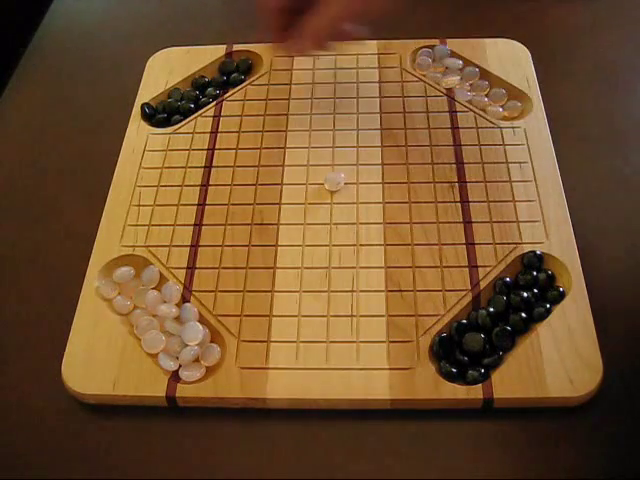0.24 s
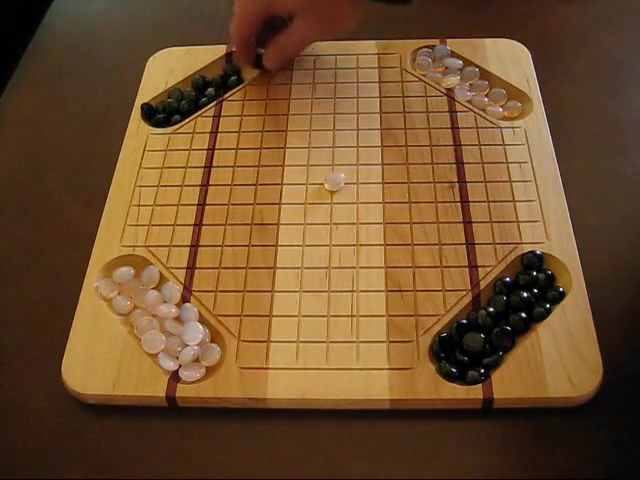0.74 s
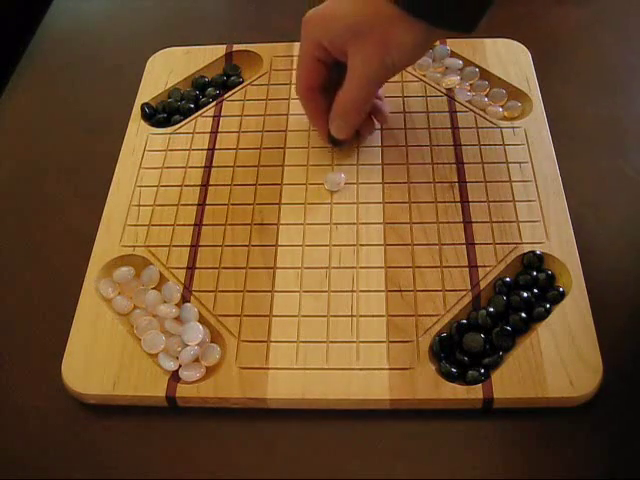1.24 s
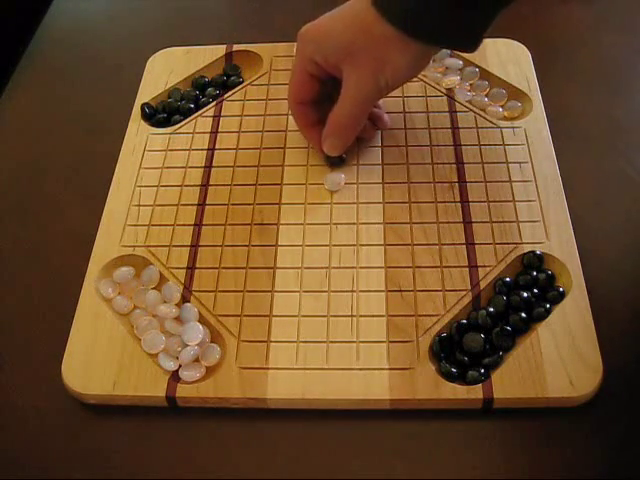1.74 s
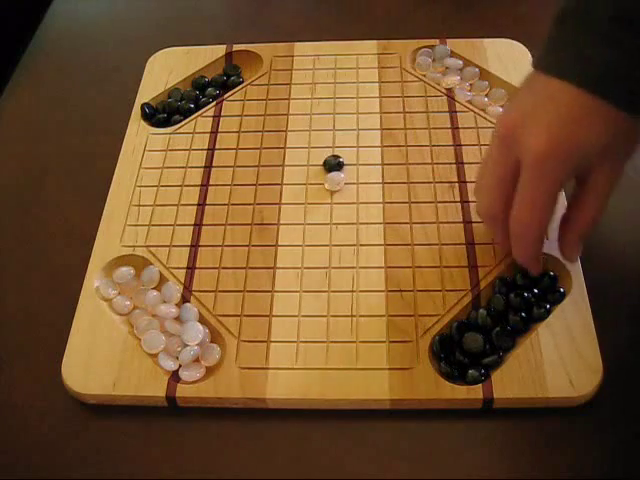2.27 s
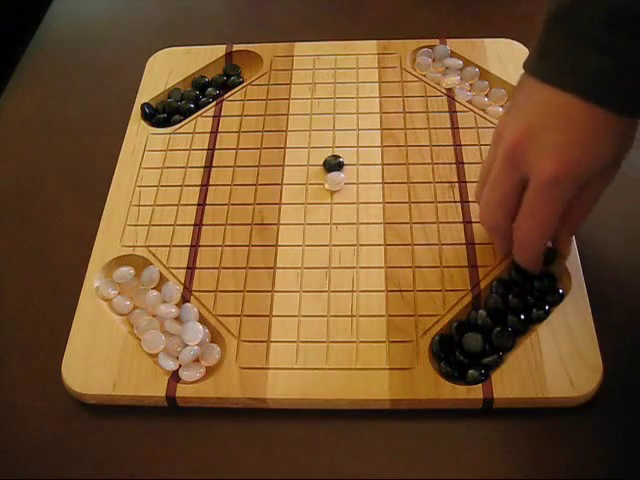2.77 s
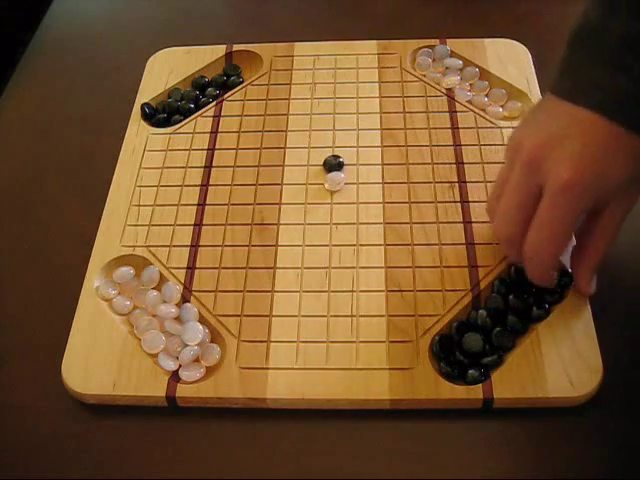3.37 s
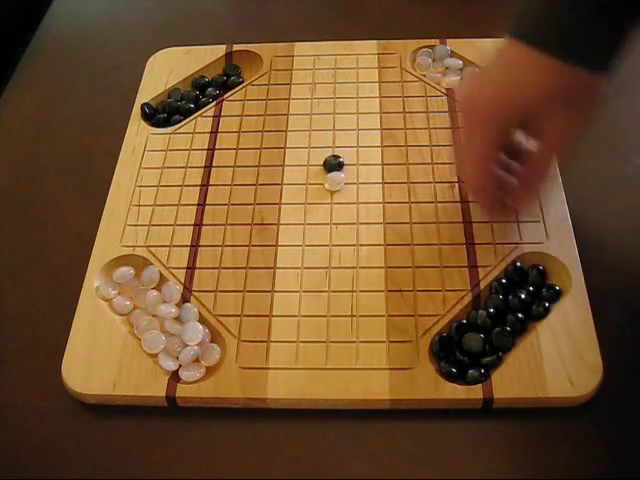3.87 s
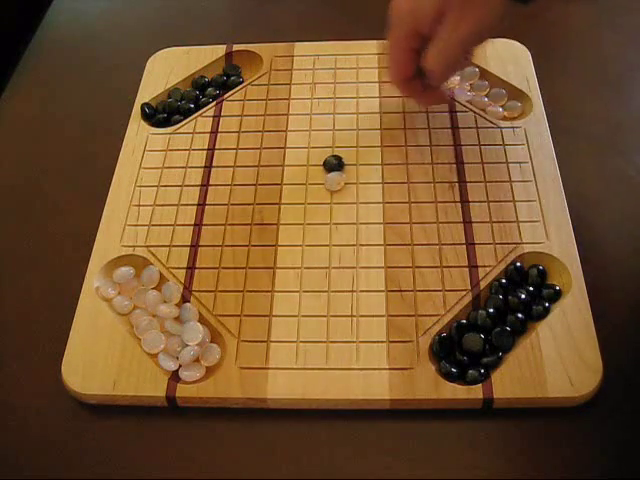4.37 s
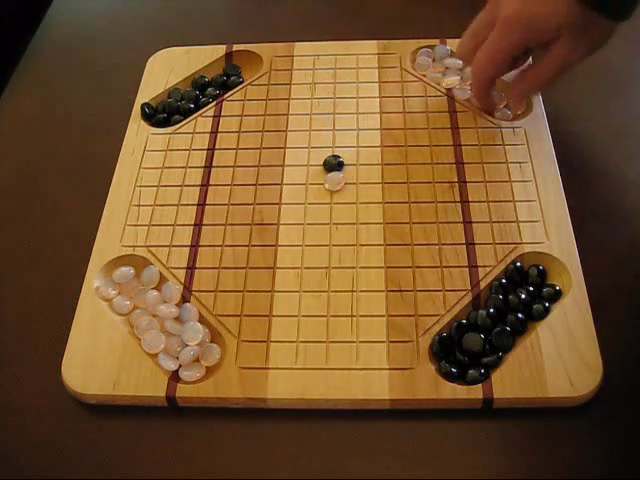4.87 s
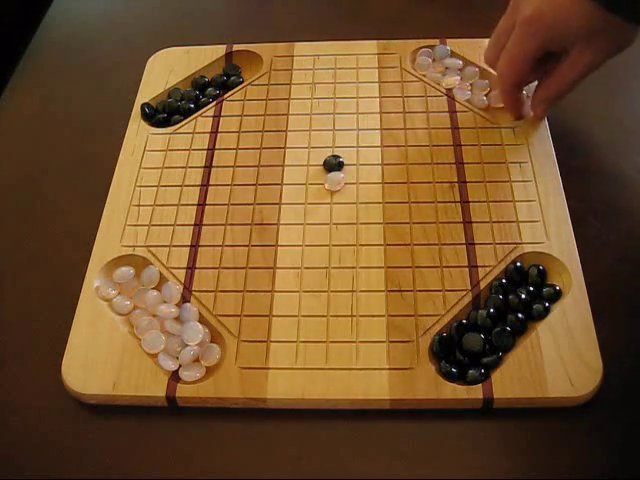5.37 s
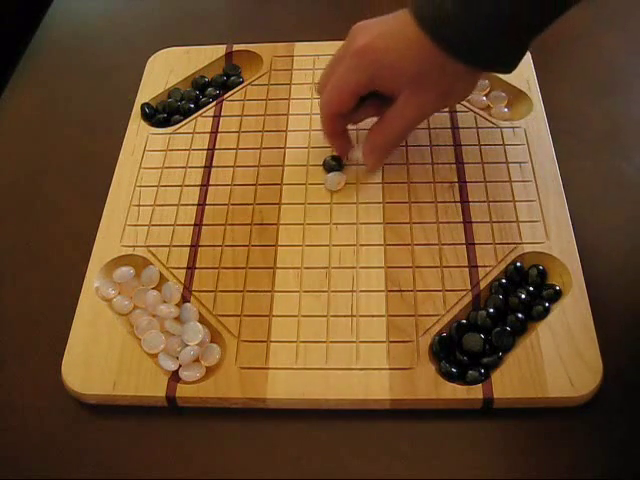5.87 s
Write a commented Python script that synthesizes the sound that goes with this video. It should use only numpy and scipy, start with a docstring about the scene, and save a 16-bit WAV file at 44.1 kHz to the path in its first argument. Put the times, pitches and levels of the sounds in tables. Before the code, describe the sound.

Glass playing pieces handled on a wooden board, heard close and dry with a short room reflection. Soft tray ticks come first, then a crisp solid knock on the wood. Dense glassy rattling fills the middle, with scraping fingers and woody clicks, then near silence. Gentle fumbling leads to a brief stuttering scrape and a final clack that rocks rapidly. Room hiss, a fading distant rush and a faint drone lie beneath.

```python
"""Glass gems on a wooden game board

Close up in a quiet room, fingers stir and pick gems from carved trays, drag one up a tray wall and set two down;
the last one rocks. Damped modes and filtered noise bursts make the knocks and glass ticks, sparse noise grains
the rubbing, and a train of short slips the drag. Under it lie shaped noise for the room, the hiss and a far rush
that dies away, and wavering, slowly sinking sines for a faint drone."""
import sys
import numpy as np
from scipy import signal
from scipy.fft import rfft, irfft, next_fast_len
from scipy.io import wavfile
from scipy.ndimage import map_coordinates

SR = 44100
rng = np.random.default_rng(int(sys.argv[2]) if len(sys.argv) > 2 else 0)


def int16_out(signal):
    """Quantize to a 16-bit WAV file."""
    q = np.round(np.clip(np.atleast_2d(signal).T, -1, 1) * 32767)
    wavfile.write(sys.argv[1], SR, q.astype(np.int16))


N = 269499
CLOCK = np.arange(N) / SR  # whole scene, s
HIT_CLOCK = np.arange(SR // 4) / SR  # one hit, s

# colour of a carved wooden tray being knocked or rubbed: (f/Hz, relative level/dB)
TRAY_COLOUR = [(60, -44), (300, -17.5), (1100, -11), (1500, -6.5), (2100, 3.5), (2600, -7), (3200, 0),
               (4500, -6.5), (6000, -12), (8000, -19.5), (16000, -26)]
# colour of glass touching glass: (f/Hz, relative level/dB)
GLASS_COLOUR = [(300, -97), (2000, -43), (5000, -13.5), (7000, -2.5), (9500, 5), (12000, 1), (15000, -3.5),
                (17000, -35)]


def amp(db):
    """Decibels to gain."""
    return 10 ** (np.asarray(db) / 20)


def unit(x):
    """x at rms 1."""
    return x / np.sqrt(np.mean(x ** 2) + 1e-20)


def blow(x):
    """x scaled to the energy of one millisecond of a full-scale sine."""
    return x / np.linalg.norm(x) * np.sqrt(SR / 2000)


def along(points, hz):
    """(Hz, value) points read on a log frequency axis."""
    f, v = np.transpose(points)
    return np.interp(np.log(hz + 1), np.log(f + 1), v)


def filtered(x, response):
    """x with its spectrum multiplied by a zero-phase response of frequency."""
    m = next_fast_len(len(x) + 8192)
    spectrum = rfft(x, m) * response(np.fft.rfftfreq(m, 1 / SR))
    return irfft(spectrum, m)[:len(x)]


def coloured(x, points, size=4096):
    """x through a minimum-phase filter with the (Hz, dB) shape, so that no sound precedes its cause."""
    gain = amp(along(points, np.fft.rfftfreq(size, 1 / SR)))
    cepstrum = irfft(np.log(gain))
    # folding the cepstrum onto positive time makes the filter causal
    cepstrum[1:size // 2] *= 2
    cepstrum[size // 2 + 1:] = 0
    impulse = irfft(np.exp(rfft(cepstrum)))
    return signal.fftconvolve(x, impulse)[:len(x)]


def add(track, s, sound):
    """Mix a sound into the track at time s."""
    part = track[max(round(s * SR), 0):][:len(sound)]
    part += sound[:len(part)]


def ring(modes, scatter_db, detune):
    """Sum of exponentially damped sine modes, with new strengths and slight detuning on every hit."""
    hz, db, t60 = np.transpose(modes)[:, :, None]
    size, shift = rng.standard_normal((2, len(modes), 1))
    sign = (-1) ** np.arange(len(modes))[:, None]  # alternate polarity
    envelope = amp(db + scatter_db * size - 60 * HIT_CLOCK / t60)
    tones = np.sin(2 * np.pi * hz * (1 + detune * shift) * HIT_CLOCK)
    return np.sum(sign * envelope * tones, axis=0)


def crack(t60):
    """A burst of contact noise that decays by 60 dB in t60 seconds."""
    return rng.standard_normal(len(HIT_CLOCK)) * amp(-60 * HIT_CLOCK / t60)


def in_room(x, wet_db, early_db=-13, early_t60=0.021):
    """x with its bounce off the table, near reflections and a room tail, drawn anew on each call."""
    # reverberation time of the room: (f/Hz, t60/s)
    room_decay = [(200, 1), (1000, 0.57), (3000, 0.22), (6000, 0.22), (14000, 0.13)]
    hz, t, z = signal.stft(rng.standard_normal(SR // 3), SR, nperseg=256)
    decay = amp(-60 * t / along(room_decay, hz)[:, None])
    tail = signal.istft(z * decay, SR, nperseg=256)[1]
    tail *= np.clip(np.arange(len(tail)) / SR / 0.0028, 0, 1) ** 2  # builds up over 2.8 ms
    near = crack(early_t60) * (HIT_CLOCK > .002)
    answer = amp(wet_db) * tail / np.linalg.norm(tail)
    add(answer, 0, amp(early_db) * near / np.linalg.norm(near))
    answer[0] += 1  # direct sound
    bounce = round(SR * rng.uniform(.00117, .00124))
    answer[bounce] += .45
    return signal.fftconvolve(x, 0.81 * answer)


def drone():
    """A faint far tone: sines that come and go in spells, sink slowly in pitch and waver in level."""
    # spells of the drone: (start/s, end/s, f at the start/Hz, level before the waver/dB)
    spells = [(-.2, .48, 166, -56), (.72, 1.16, 109, -56), (1.15, 2.6, 106.8, -67.5),
              (2.605, 4.797, 104.3, -63), (4.78, 6.3, 103.3, -58.5)]
    fade_s, sag_hz_per_s = 0.1, 0.399
    out = np.zeros(N)
    for start, end, hz, db in spells:
        gate = np.clip(np.minimum(CLOCK - start, end - CLOCK) / fade_s + .5, 0, 1)
        pitch_hz = hz - sag_hz_per_s * (CLOCK - start)
        out += amp(db) * gate * np.sin(2 * np.pi * np.cumsum(pitch_hz) / SR)
    waver = map_coordinates(rng.standard_normal(64), [CLOCK * 7], mode="mirror")  # 7 random points per second
    return amp(.7 * waver) * out


def background():
    """Noise shaped into steady room tone and hiss, a soft far rush that dies away, and the drone."""
    # colour of the room noise and hiss, held level above 14 kHz: (f/Hz, relative level/dB)
    quiet_colour = [(15, -34), (25, -10.5), (69, -9.5), (101, -5), (129, -7), (178, -7.5), (209, -6.5),
                    (399, -7.5), (445, -8.5), (945, -11), (1800, -12.5), (3260, -16.5), (7910, -21.5),
                    (10600, -19), (15500, -23)]
    hiss_top_hz = 15700
    rush_start_db, rush_fall_db_per_s, rush_rest_db = -51, 6.5, -65
    rush_colour = [(100, -5), (400, -3.0), (800, 2.0), (1400, -5.5), (4000, -22.0), (12000, -24)]  # (f/Hz, level/dB)

    def quiet_response(hz):
        return amp(along(quiet_colour, np.minimum(hz, 14000))) * (hz < hiss_top_hz)

    steady = filtered(rng.standard_normal(N), quiet_response)
    rush = coloured(rng.standard_normal(N), rush_colour)
    rush_db = np.maximum(rush_start_db - rush_fall_db_per_s * CLOCK, rush_rest_db)
    return amp(-51.5) * unit(steady) + amp(rush_db) * unit(rush) + drone()


def rubbing(at):
    """Drive in dB on wood and on glass at the given times: each push swells and fades, and the strongest leads."""
    # pushes of the fingers through the gems:
    # (t at the hardest/s, length/s, drive on wood/dB, drive on glass/dB)
    strokes = [(0.065, 0.25, -49, -42), (0.512, 0.13, -38.5, -62), (0.67, 0.86, -50, -55),
               (2.401, 0.15, -37.5, -48), (2.676, 0.21, -42, -56), (2.78, 0.27, -43.5, -63),
               (3.04, 0.4, -37, -62), (3.497, 0.18, -45.5, -61), (3.807, 0.21, -42.5, -43),
               (4.588, 0.059, -63, -39.5), (4.703, 0.063, -64, -44), (4.868, 0.27, -51, -54),
               (5.093, 0.95, -51.5, -54), (5.374, 0.13, -42.5, -46), (5.593, 0.3, -45, -52)]
    rise, edge_drop_db = 0.48, 21.5  # share of a push spent swelling; how much weaker it is at both ends
    s, length, wood_db, glass_db = np.transpose(strokes)[:, :, None]
    fade_db = edge_drop_db * np.maximum((s - at) / rise, (at - s) / (1 - rise)) / length
    return np.max(wood_db - fade_db, axis=0), np.max(glass_db - fade_db, axis=0)


def stirring(grains_per_s=150):
    """Sparse noise grains: gems scrape the tray and each other, and the same pushes rumble the board softly."""
    # colour of the whole board pushed by the hand: (f/Hz, relative level/dB)
    body_colour = [(60, -29), (130, -7), (190, 3), (300, -3.5), (480, 0.5), (1000, -10.5), (2500, -14.5)]

    def rubbed(colour):
        grains = (rng.random(N) < grains_per_s / SR) * rng.standard_normal(N)
        grains += 0.026 * rng.standard_normal(N)  # thin continuous rub between grains
        return unit(in_room(coloured(grains, colour), wet_db=-5)[:N])

    wood_db, glass_db = rubbing(CLOCK)
    wood = rubbed(TRAY_COLOUR) + amp(-6.5) * rubbed(body_colour)
    return amp(wood_db - 1) * wood + amp(glass_db - 5.5) * rubbed(GLASS_COLOUR)


def clink(knock_db, tick_db, pitch_hz):
    """Glass ticks on glass, and the wooden hollow under it knocks at a pitch set by where the gem lies."""
    usual_hz, colour_follows = 3130, 0.45  # how far the tray's colour moves with the knock's pitch
    tick_rise_s = 0.00039  # the tick swells in briefly before it decays
    modes = [(pitch_hz, 0, .009), (1.7 * pitch_hz, -8, .006)]  # (f/Hz, level/dB, t60/s)
    hollow = ring(modes, scatter_db=2, detune=.02) * (1 - np.exp(-HIT_CLOCK / .0002))
    shift = (pitch_hz / usual_hz) ** colour_follows
    grit = coloured(crack(0.015), [(hz * shift, db) for hz, db in TRAY_COLOUR])
    knock = blow(blow(hollow) + amp(-3.5) * blow(grit))
    tick = coloured(crack(0.0054) * (1 - np.exp(-HIT_CLOCK / tick_rise_s)), GLASS_COLOUR)
    return amp(knock_db - 2.5) * knock + amp(tick_db - 3.5) * blow(tick)


def nudged_gems():
    """Stray small clinks at chance moments, as strong as the fingers are pushing."""
    nudges_per_s, usual_hz = 12, 2970
    knock_over_rub_db, tick_over_rub_db = 11.5, 15  # added to the drive of the rubbing
    out = np.zeros(N)
    for k, (when, shift) in enumerate(rng.random((int(nudges_per_s * N / SR), 2))):
        s = (k + when) / nudges_per_s
        wood_db, glass_db = rubbing(s)
        pitch_hz = usual_hz * (1 + 0.31 * (shift - .5))
        add(out, s, clink(wood_db + knock_over_rub_db, glass_db + tick_over_rub_db, pitch_hz))
    return in_room(out, wet_db=-1.0)[:N]


def placed_gems():
    """Landings clack and ring the board, each with its own brightness; a stronger one rings less for its clack."""
    # knocks on the playing surface, mostly gems landing and rocking:
    # (t/s, strength before the room/dB, brightness cut-off f/Hz)
    landings = [(.012, -19, 6000), (1.4876, -7, 3430), (1.6416, -21.5, 4600), (1.6437, -0.5, 6400),
                (1.6516, -8, 5000), (1.998, -33.5, 3320), (4.294, -35, 4000), (5.9779, -14, 6240),
                (6.003, -11, 6500), (6.0067, -1.5, 6800), (6.0246, -3.5, 8000), (6.0374, -3.5, 9360),
                (6.0458, -12, 5500), (6.0623, -7.5, 8000), (6.0702, -4, 8500), (6.0786, -9.5, 6600),
                (6.0914, -6.5, 8050), (6.097, -6, 8350), (6.1067, -8, 7000)]
    # modes of the brief clack of a gem on wood: (f/Hz, relative level/dB, t60/s)
    clack_modes = [(740, -57, 0.013), (1193, -27.5, 0.041), (1838, -15, 0.011), (2500, -7.5, 0.0018),
                   (3400, 2, 0.0025), (3775, -5, 0.0072), (4960, 0, 0.0033), (5900, -8.5, 0.0027),
                   (8800, -14, 0.0062), (10870, -4, 0.0026), (12450, 0, 0.0024), (14350, -2.5, 0.011)]
    # modes of the board ringing on: (f/Hz, relative level/dB, t60/s)
    board_modes = [(554, -45, .15), (1140, -41, .1), (1690, -35, .1), (1780, -32, .15), (2490, -37, .12),
                   (2780, -33, .11), (3320, -34, .12), (3880, -35, .12), (4850, -36, .1), (5660, -36, .12)]
    # colour of the board's crowd of other modes: (f/Hz, relative level/dB)
    wood_colour = [(60, -63), (300, -10.5), (550, -2.5), (750, -12), (1100, 0.5), (1750, 1.5), (3500, -0.5),
                   (6000, -4), (8000, -2), (16000, -45)]
    ring_db, ring_loss = -2, 0.43  # ring under a 0 dB landing; dB of ring lost per dB of stronger knock
    out = np.zeros(N)
    for s, db, cutoff_hz in landings:
        clack = ring(clack_modes, scatter_db=1, detune=.012) * (1 - np.exp(-HIT_CLOCK / .0003))
        modes = ring(board_modes, scatter_db=1.5, detune=.003) * (1 - np.exp(-HIT_CLOCK / .001))
        crowd = blow(coloured(crack(0.16), wood_colour))
        board = amp(-5.0) * modes + amp(-13.0) * crowd
        glass = blow(coloured(crack(0.031), GLASS_COLOUR))
        hit = blow(clack) + amp(ring_db - ring_loss * db) * board + amp(-11.0) * glass
        hit = signal.lfilter(*signal.butter(3, cutoff_hz, fs=SR), hit)
        add(out, s, in_room(amp(db) * blow(hit), wet_db=-12))
    return out


def tray_gems(neighbours=3):
    """Gems knock together in a tray, and every knock jostles a few neighbours, which answer more weakly."""
    # main clinks: (t/s, tray knock drive/dB, glass tick drive/dB, knock f/Hz)
    clinks = [(0.074, -28, -22.5, 3100), (0.491, -28, -32, 2900), (.513, -21.5, -21, 2090),
              (.5254, -20, -38, 2170), (0.5417, -21, -11, 2000), (.703, -29.5, -46, 2190),
              (2.3671, -35, -19.5, 3200), (2.374, -12, -7.5, 2160), (2.38, -12.5, -16, 3130),
              (2.3945, -15, -40, 2960), (2.4115, -14.5, -11.5, 3026), (2.6116, -31, -26.5, 3180),
              (2.7575, -25.5, -39, 3200), (2.774, -12, -14, 3370), (2.8192, -11, -9.5, 2950),
              (2.9048, -30, -26, 4250), (2.9302, -18.5, -13.5, 3220), (3.0006, -30, -48, 3150),
              (3.019, -4, -3, 3340), (3.03, -14, -11, 3040), (3.042, -11.5, -24, 2950),
              (3.0677, -15, -29, 3040), (3.0975, -16, -40, 3420), (3.135, -8.5, -7, 3660),
              (3.148, -14, -20, 3150), (3.309, -20.5, -17.5, 3140), (3.3656, -23.5, -19, 3080),
              (3.3818, -27.5, -24, 3200), (3.4706, -25.5, -47, 3240), (3.492, -19.5, -18.5, 3260),
              (3.5231, -13, -11.5, 3140), (3.6452, -5.5, -5.5, 4270), (3.656, -9.5, -13, 3260),
              (3.7796, -6.5, -6.5, 4240), (3.7905, -13.5, -15, 2940), (3.8281, -24.5, -24.5, 2950),
              (4.8034, -28, -54, 2820), (4.8714, -26.5, -21.5, 2740), (4.9014, -15, -23.5, 2240),
              (5.0231, -23.5, -22.5, 2530), (5.3758, -25, -48, 2500)]
    out = np.zeros(N)
    for s, knock_db, tick_db, pitch_hz in clinks:
        hit = clink(knock_db, tick_db, pitch_hz)
        for delay, size, shift in rng.random((neighbours, 3)):
            weaker_db = -13 - 9 * size
            answer = clink(knock_db + weaker_db, tick_db + weaker_db, pitch_hz * (0.875 + .5 * shift))
            add(hit, .002 + 0.011 * delay, answer)
        add(out, s, in_room(hit, wet_db=-8.0))
    return out


def dragged_gem():
    """A gem sticks and slips up the tray wall at an uneven rate, ever faster as the hand lifts it."""
    start_s, end_s = 5.518, 5.611
    slips_per_s, slips_gained_per_s = 160, 150  # mean rate at first; what is added by the end
    slip_db, soft_start_db, grip_s = -22.5, 2, 0.012  # drive; how much weaker at first; time to take hold
    slip_colour = [(500, -40), (1200, -15.5), (1900, 4), (2600, 1.5), (3250, 7.5), (3900, -0.5),
                   (5100, -8.5), (6200, -20.5), (15000, -37)]  # (f/Hz, relative level/dB)
    slips, s = np.zeros(N), start_s
    while s <= end_s:
        size, wait = rng.uniform(-1, 1, 2)
        age = s - start_s
        db = slip_db - soft_start_db * np.exp(-age / grip_s)
        add(slips, s, np.array([amp(db + 2.5 * size)]))
        rate = slips_per_s + slips_gained_per_s * age / (end_s - start_s)
        s += (1 + 0.5 * wait) / rate
    slip = blow(coloured(signal.unit_impulse(len(HIT_CLOCK)), slip_colour))
    return signal.fftconvolve(slips, in_room(slip, wet_db=-13.5))[:N]


def scene():
    """All sources summed at one microphone."""
    gems = stirring() + nudged_gems() + placed_gems() + tray_gems() + dragged_gem()
    return (background() + gems)[None]


def record(dry):
    """The treble is notched near 8 kHz, the tallest peaks are rounded off, and nothing sounds above 16.9 kHz."""
    # narrow notch in the microphone's response: (f/Hz, gain/dB)
    microphone_response = [(6500, -0.5), (7400, -6.5), (7750, -19), (7920, -35), (8100, -15), (8500, -5),
                           (9200, -4.5)]
    ceiling, top_hz = .99, 16900
    x = coloured(dry[0], microphone_response)
    x = x / (1 + np.abs(x / ceiling) ** 8) ** (1 / 8)
    return filtered(x, lambda hz: hz < top_hz)[None]


dry = scene()
out = record(dry)
int16_out(out)
```